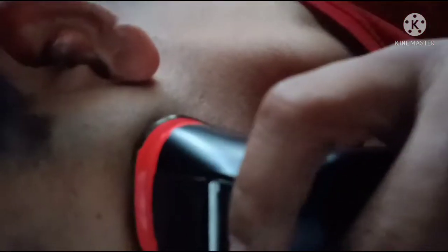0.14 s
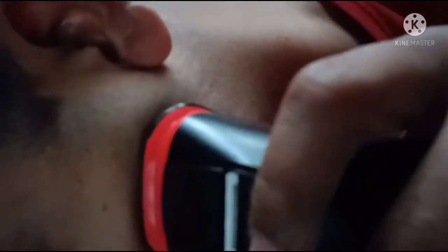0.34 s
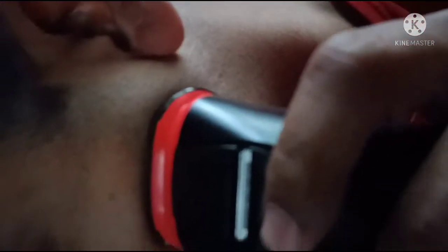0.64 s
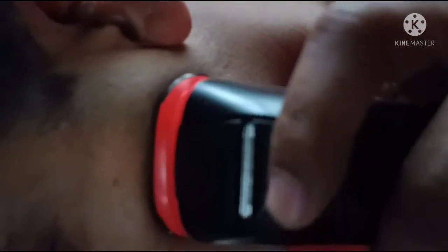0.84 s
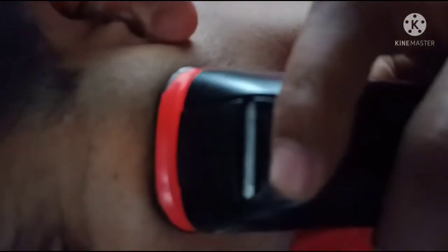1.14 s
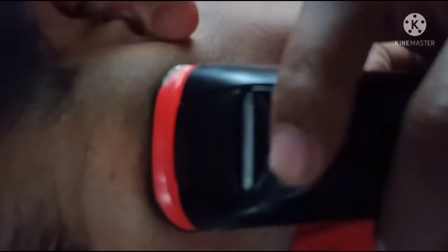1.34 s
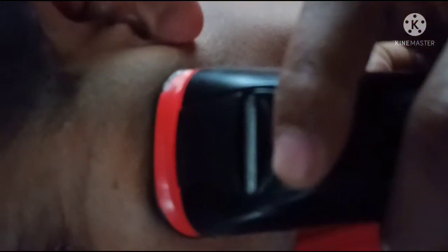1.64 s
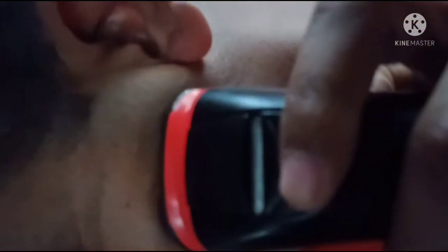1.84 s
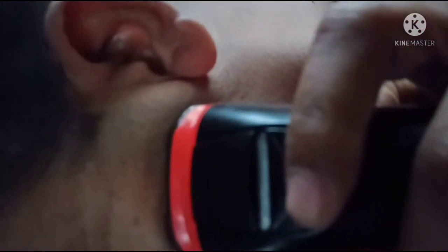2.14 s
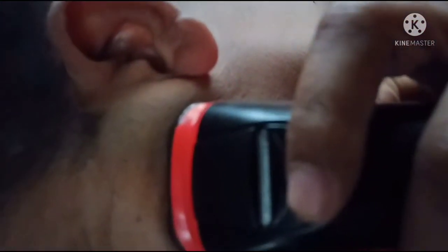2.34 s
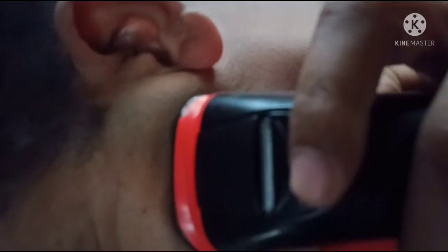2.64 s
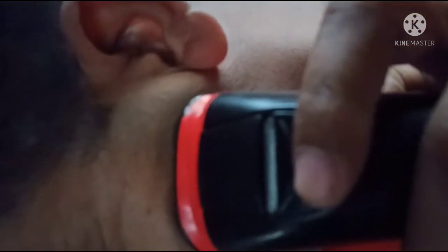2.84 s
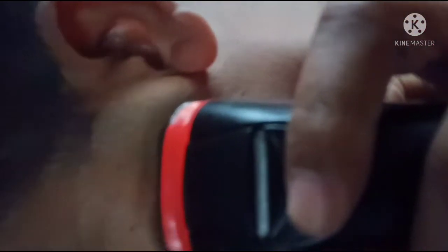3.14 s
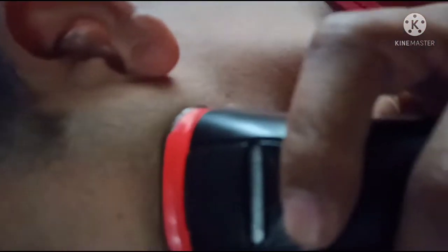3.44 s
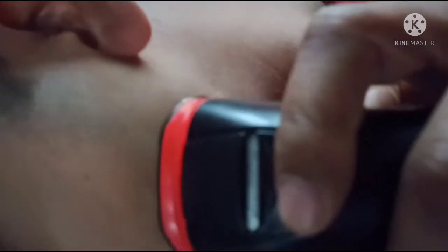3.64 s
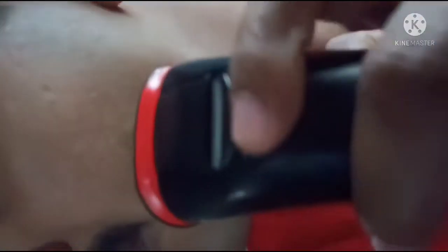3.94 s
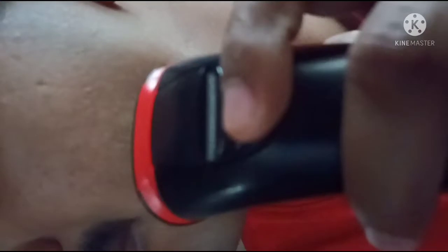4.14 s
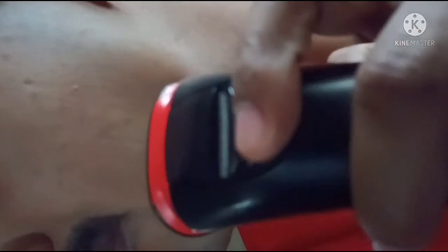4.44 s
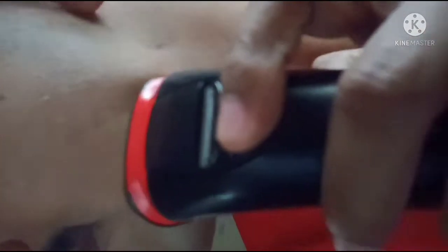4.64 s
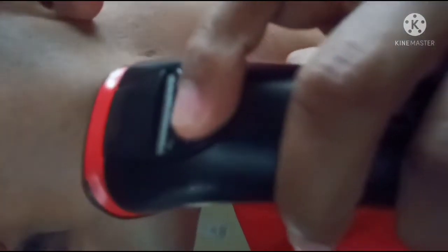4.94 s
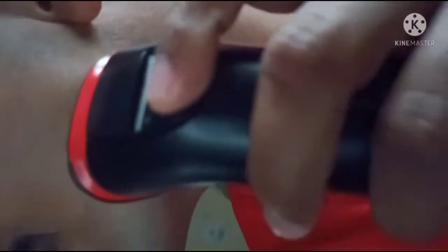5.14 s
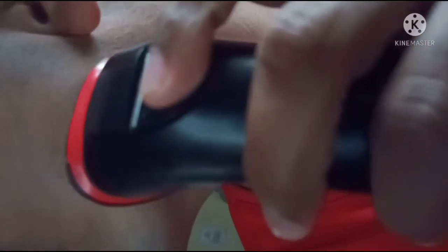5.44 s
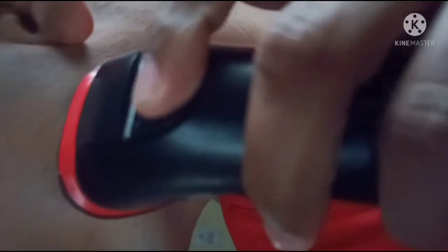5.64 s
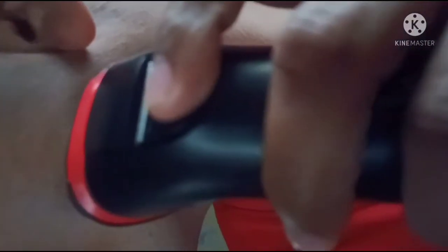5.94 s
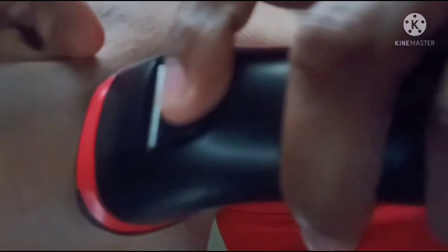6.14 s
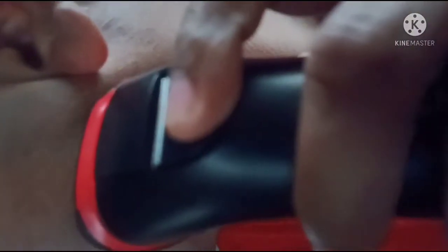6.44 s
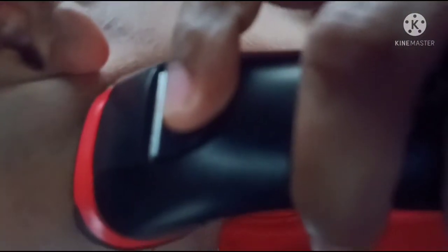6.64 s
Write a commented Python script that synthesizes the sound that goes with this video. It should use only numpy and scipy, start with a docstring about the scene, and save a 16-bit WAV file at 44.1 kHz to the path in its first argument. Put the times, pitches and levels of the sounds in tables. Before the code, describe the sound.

A geared electric shaver buzzes continuously for about 6.8 seconds, heard very close in a quiet room with only faint low noise behind. A rough rattle, fluttering nearly fifty times a second, sits under a steady gear whine around 2.4 kHz and a fine hiss from the metal foil. At 0 s it is pressed firmly, loud and ringing, with dull soft bumps around 0.3 to 0.4 s. By 0.8 s it lightens and thins. From about 2.3 s it is pressed again: the motor sags very slightly, rasp and hiss thicken, and a blade tone near 1.9 kHz swells, strongest around 3.2 to 4 s. Tiny dry hair ticks appear near 2.1, 3.0, and 4.0 to 4.5 s. From 4.7 s it speeds up and turns lighter, with looser metallic ringing and a faint bump at 5.0 s. Near 6.4 s the cutter settles, with tiny ticks, still buzzing at the end.

```python
"""A geared electric shaver is worked over a cheek, close by in a quiet room, for 6.8 seconds.
It starts pressed firmly, among a few soft bumps, then lightens within a second. From about 2.3 s it is
pressed again: the motor slows, the blades' tone swells and hairs tick. From about 4.7 s it runs lighter
and faster, its cutter loose until 6.4 s. Gear and blade tones, repeating rattle, bursts of ringing once
a turn and filtered noise make up the shaver; fading low tones make the bumps, quiet noise the room."""
import sys
import numpy as np
from scipy import signal
from scipy.fft import rfft, irfft, next_fast_len
from scipy.io import wavfile
from scipy.ndimage import map_coordinates

SR = 44100
rng = np.random.default_rng(int(sys.argv[2]) if len(sys.argv) > 2 else 0)


def wrap_up_sound(samples):
    """Save the sound to the file named by the first command line argument, as 16-bit audio."""
    columns = np.atleast_2d(samples).T
    # keep every value between -1 and 1, then stretch to whole-number steps
    tamed = np.clip(columns, -1, 1)
    steps = np.round(tamed * 32767).astype(np.int16)
    wavfile.write(sys.argv[1], SR, steps)


N = 299880
T = np.arange(N) / SR  # time of each sample in seconds

# Levels in the tables are those before any later filter or swell.
# Colour of the room's faint noise. Each row: pitch in Hz, level in dB.
ROOM_COLOUR = [(15, -47), (25, -38), (48, -0.5), (112, -2.5), (228, -5), (297, -7.5), (355, -9.5), (383, 0),
               (414, -12), (520, -14), (680, -10.5), (1140, -120)]
# Soft bumps. Each row: start in seconds, pitch in Hz, level in dB, rise in seconds, decay in seconds.
BUMPS = [(.01, 112.5, -52.5, 0.052, 0.098), (.283, 287, -44, 0.0014, 0.047),
         (.312, 230, -38.5, 0.0027, 0.018), (0.327, 164, -43.5, 0.022, 0.029),
         (0.381, 176.3, -40.5, 0.016, 0.061), (0.601, 171, -56, 0.025, 0.03),
         (1.19, 109, -53, 0.018, 0.021), (1.45, 194, -62, 0.076, 0.35), (3.03, 110, -59, 0.014, .025),
         (3.24, 115, -59, .015, 0.048), (4.382, 108, -53, 0.017, 0.019), (4.93, 180, -57, 0.019, 0.15),
         (5.022, 225, -47.5, 0.025, 0.024), (5.869, 223, -58, 0.016, .025), (6.1, 233, -64, 0.037, 0.15)]
# Thick hairs that snap. Each row: time in seconds, level in dB.
CUTS = [(2.005, -42), (2.144, -37), (2.325, -46), (2.999, -43), (4.003, -40), (4.064, -45), (4.224, -41),
        (4.461, -35), (6.444, -46), (6.709, -40)]
# Rings of the head that sound for a while, several of them overtones of the cutter's squeal. Each row: start
# and end in seconds, pitch in Hz, level in dB, # place in the turn from 0 to 1, decay as a share of the turn,
# roughness in radians.
BUZZES = [(-.2, .32, 1550, -37.5, .3, .14, .6), (-.2, .65, 2700, -48.5, .15, .1, .8),
          (-.1, .85, 6320, -57.5, .45, .15, 1.2), (-.2, .75, 8330, -58, .1, .3, 1.4),
          (.11, .75, 9850, -55, .75, .16, 1.2), (.5, .8, 3130, -54, .3, .4, .3),
          (.62, .8, 3630, -55, .3, .4, .3), (.8, 1.02, 4450, -51, .83, .14, .9),
          (.76, 1.08, 10750, -58, .4, .3, 1.2), (.95, 2.2, 8130, -57, .3, .4, .5),
          (1.25, 3.1, 3620, -52, .18, .55, .4), (1.1, 2.7, 2030, -45, .5, .85, .2),
          (1.15, 2.7, 1425, -48, .2, .4, .3), (2.15, 3.2, 8130, -53, .77, .2, .5),
          (2.7, 3.45, 2682, -47, .4, .9, .4), (4.1, 4.7, 3820, -49, .1, .4, .9),
          (5.0, 6.2, 6130, -56.5, .55, .45, .5), (5.05, 6.9, 8380, -55.5, .45, .35, 1.3),
          (5.4, 5.7, 8500, -54.5, .2, .4, 1.2), (5.1, 5.85, 11100, -63, .3, .4, 1.8),
          (5.95, 6.35, 12370, -54.5, .7, .4, 1.2), (6.4, 7.1, 12470, -53.5, .7, .4, 1.7),
          (6.2, 7, 6250, -58, .55, .45, 1.6)]

# Speed of the cutter. Each row: time in seconds, turns per second (Hz).
SPEED = [(0, 48.6), (.09, 48.92), (.55, 49.05), (.78, 49.0), (1.1, 48.47), (1.85, 48.4), (2.3, 48.13),
         (2.55, 48.18), (2.72, 47.92), (3.0, 47.83), (3.62, 47.92), (3.76, 47.73), (3.92, 47.72),
         (4.03, 47.33), (4.3, 47.5), (4.65, 47.95), (5.07, 48.78), (5.45, 48.95), (6.25, 48.64),
         (6.8, 48.63)]
# Pressure of the head on the skin. Each row: time in seconds, pressure (0 is a light touch, 1 is firm).
PRESSURE = [(0, 1.27), (.2, 1.07), (.5, 0.5), (.85, 0.21), (1.5, 0.42), (1.9, 0.41), (2.2, 0.61),
            (2.53, 0.57), (2.8, 0.89), (3.25, 0.79), (3.65, 0.7), (4.05, 0.91), (4.2, 0.72), (4.55, 0.7),
            (4.8, 0.54), (5.25, 0.19), (5.85, 0.2), (6.2, 0.44)]
# How three sounds grow with effort. Each holds: dB at a light touch, dB more at firm pressure,
# dB more at the heaviest drag.
RASP_LAW = (-44.5, 11.43, -0.62)
RATTLE_LAW = (-44, 10.5, -7.5)
MOTOR_LAW = (-55.5, 14.2, 1.5)

# Colour of the plastic housing. Each row: pitch in Hz, level in dB.
HOUSING = [(100, -44.5), (520, -31), (750, -22), (1000, -13.5), (1300, -9.5), (1480, 1), (1900, -4),
           (2430, 5), (2580, -6.5), (3000, -10.5), (3350, -20.5), (3750, -10), (4500, -10), (5600, -25.5)]
# Colour of the metal foil. Each row: pitch in Hz, level in dB.
FOIL = [(300, -57), (3300, 2.5), (4800, -12), (5600, 4), (7000, 5.5), (7600, -1), (8700, 4), (10200, 6.5),
        (11200, 4.5), (12600, 7), (14300, 1), (15400, 4)]
# Narrow resonances laid over both. Each row: pitch in Hz, width in Hz, lift in dB.
RINGS = [(900, 44, 4.5), (1287, 50, -4.5), (1520, 107, -8.5), (1700, 120, -2), (4100, 200, 4),
         (6120, 150, 6), (8110, 226, 6.5), (8570, 130, 7.5), (9480, 540, 8), (10130, 140, 3.5),
         (12300, 270, 2.5), (5900, 70, 0.5), (5660, 39, 5), (6790, 59, 2.5), (8140, 99, 8),
         (9300, 150, 1.5), (4630, 79, -5)]
# The housing resonance damped by the skin. It holds: pitch in Hz, width in Hz, dB at firm pressure.
DAMPED = (2406, 260, -6.5)
# How hand and cheek lie round the head. Each row: time in seconds, gain of the hollows in dB
# (negative as they close in) before each hollow takes its share.
GRIP = [(0, -1.5), (.5, 5), (.76, -0.5), (.9, -2), (1.9, -6), (2.9, -0.5), (4.1, 1.5), (4.4, -2.5),
        (5.2, -0.5), (5.6, 1.5), (6.8, 0)]
# Bands that hand and cheek damp. Each row: pitch in Hz, width in Hz, share of the gain above.
HOLLOWS = [(2800, 655, 0.99), (6100, 1600, 0.27), (14700, 770, 0.25)]
# Gliding hollows and peaks. Each row: start and end in seconds, from Hz, to Hz, width in Hz, gain in dB.
SWEEPS = [(0.65, 1.3, 4000, 2960, 400, -10), (.25, 1.0, 12200, 11800, 620, -7),
          (.6, 2.5, 11700, 11200, 400, -6), (.5, 2.6, 14700, 14300, 900, -4),
          (2.9, 5.9, 2400, 3100, 210, -4), (1.6, 3.9, 7650, 7450, 200, -3), (4.3, 6.4, 3400, 3600, 300, -6),
          (4.9, 5.8, 12800, 16000, 700, -6), (5.0, 6.16, 6900, 6600, 450, -10),
          (4.96, 5.9, 9700, 9100, 490, -4), (5.9, 7.4, 14500, 13800, 600, 3),
          (4.2, 5.5, 11300, 11900, 400, -4), (1, 1.7, 6700, 6750, 300, -4), (5.5, 7.2, 3150, 3200, 150, -5),
          (4.9, 7.6, 8600, 8400, 200, 3)]

# Spells in which the cutter rocks, seated or loose, and rings at two pitches. Each row: time of the
# height in seconds, swell in seconds, fade in seconds, low pitch in Hz, low level in dB,
# high pitch in Hz, high level in dB.
ROCKING = [(.26, 0.11, 0.15, 2010, -35.5, 4110, -34), (.52, 0.24, 0.34, 2209, -34, 4205, -50.5),
           (1.5, 0.57, 0.84, 2220, -69, 4200, -44.5), (2.55, 0.51, 0.65, 2040, -69, 4156, -43),
           (3.8, 0.67, 0.61, 1944, -41.5, 4104, -48), (4.45, 0.3, 0.26, 2190, -58, 4150, -43.5),
           (4.85, 0.2, 0.26, 2072, -41, 4330, -50.5), (5.16, 0.25, 0.36, 2119, -33, 4330, -46),
           (5.65, 0.44, 0.26, 2076, -48, 4295, -47), (5.97, 0.21, 0.15, 2120, -39, 4215, -45.5),
           (6.17, 0.19, 0.12, 2050, -51, 4180, -40), (6.55, 0.37, 0.88, 2070, -45, 4230, -50.5)]
# Knocks of the seated cutter: stroke, rebound, return. Each row: place in the turn from 0 to 1,
# level in dB against the others, rise and decay as shares of the turn.
STROKES = [(.81, 0, .04, .17), (.1, -4, .11, .15), (.32, -5, .04, .05)]
# How loosely the cutter rides. Each row: time in seconds, looseness (0 is seated, 1 is free).
LOOSE = [(4.65, 0), (4.85, 1), (6.25, 1), (6.45, 0)]

# Tone of the blades. Each row: multiple of the cutter turn, level in dB against the others.
BLADE_TONES = [(8, -39.5), (16, -17.5), (24, -5), (32, -6), (35, -8), (38, -9), (40, 0.5), (48, -10),
               (56, -3)]
# Swelling of that tone as the blades bite. Each row: time in seconds, level in dB.
BLADE_LEVEL = [(0, -43), (.7, -67), (1.9, -64), (2.25, -51), (2.65, -46), (2.8, -44.5), (3.2, -39.5),
               (3.8, -40.5), (4.05, -40.5), (4.4, -57), (4.7, -60), (6.8, -75)]
# Hiss of the foil. Each row: time in seconds, level in dB.
HISS = [(0, -47.5), (.6, -49), (.8, -51), (1.7, -51.5), (2.4, -47), (2.95, -44.5), (3.3, -45.5),
        (4.05, -44.5), (4.6, -48), (5.3, -51), (6.2, -49), (6.8, -51)]
# Tufts of stubble. Each row: time of the height in seconds, length in seconds, swell in dB.
TUFTS = [(2.323, 0.074, 2.5), (2.933, 0.12, 0.5), (3.24, 0.066, 1.5), (4.077, 0.13, 3), (6.446, 0.05, 1)]
# Housing resonances that flare as hairs catch. Each row: pitch in Hz, width in Hz.
FLARES = [(1150, 62), (1550, 180), (1850, 280), (2150, 100), (2680, 220)]
# Foil resonances that flicker at random, each by itself, as the shaver moves.
# Each row: pitch in Hz, width in Hz.
FOIL_FLICKERS = [(5800, 770), (8200, 300), (9600, 360), (12400, 700), (14800, 900)]

# Tones of the cutter gear. Each row: multiple of the cutter turn, level in dB against the others.
GEAR_TONES = [(16, -26.5), (19, -31), (20, -19), (25, -9), (28, -22), (42, -12), (50, 12.5), (100, -31),
              (125, -20)]
# Whine of that gear as a whole. Each row: time in seconds, level in dB.
WHINE = [(0, -40), (.35, -53), (.6, -36.5), (1.0, -37), (1.8, -34), (2.15, -32.5), (3.0, -38), (3.28, -45),
         (3.9, -38), (4.2, -40), (4.55, -34.5), (4.8, -40.5), (5.15, -37), (5.8, -35.5), (6.4, -42.5),
         (6.8, -45)]
# Tones of the motor. Each row: multiple of the motor turn, level in dB against the others.
MOTOR_TONES = [(1, -32.5), (9, -19), (13, 1)]
# Hums and thin whistles. Each row: start and end in seconds, multiple of the motor turn, level in dB.
WHISTLES = [(-.3, .45, 6, -57), (.2, .9, 6, -66), (-.1, .7, 15, -43), (.6, 1.1, 15, -52),
            (1.1, 2.5, 6, -69), (5.1, 6, 6, -69), (.6, 2.5, 8, -63), (4.6, 7.2, 8, -66), (-.5, .67, 9, -58),
            (5.4, 6.9, 9, -59), (.75, 2.3, 90, -63), (.75, 2.3, 93, -64), (1.1, 2.1, 71, -61),
            (2.1, 4.8, 90, -62), (4.75, 6.1, 90, -55), (5.8, 7.2, 90, -60), (5, 6.6, 85, -70),
            (5, 5.9, 88, -69), (6.05, 7, 64, -64)]
MOTOR_TURNS = 26 / 11  # turns of the motor for each turn of the cutter


def undb(db):
    """Turn decibels into a gain."""
    return 10 ** (np.asarray(db) / 20)


def curves(table):
    """Join each column of a timed table by straight lines."""
    s, *columns = np.transpose(table)
    return [np.interp(T, s, column) for column in columns]


def unit(x):
    """Scale a sound to an average (rms) strength of 1."""
    return x / np.sqrt(np.mean(x ** 2))


def walk(rate):
    """Wander smoothly at random, with about `rate` new values a second and a spread of 1."""
    knots = rng.standard_normal(8192)
    return unit(map_coordinates(knots, [T * rate], order=2, mode="mirror"))


def spell(start, end):
    """Pick the samples between two times, with a rounded swell over them."""
    on = (T > start) & (T < end)
    progress = (T[on] - start) / (end - start)
    return on, np.sqrt(np.abs(np.sin(np.pi * progress)))


def band_of(x, centre_hz, width_hz, power=2):
    """Take out one band round a pitch; a higher power gives a flatter top."""
    hz = np.arange(N // 2 + 1) * SR / N
    return irfft(rfft(x) * np.exp(-((hz - centre_hz) / width_hz) ** power), N)


def colour(x, points, rings=(), tilt_db=0):
    """Ring a sound through a body: a broad colour, narrow resonances and a slope in dB per octave."""
    size = next_fast_len(N + 8192) // 2 * 2
    hz = np.maximum(np.arange(size // 2 + 1) * SR / size, 1)
    at, db = np.transpose(points)
    gain_db = np.interp(np.log(hz), np.log(at), db)
    gain_db = gain_db + tilt_db * np.log2(np.maximum(hz, 500) / 2000)  # the slope is level below 500 Hz
    gain_db = gain_db - 12 * np.maximum(np.log2(hz / at[-1]), 0)  # falls off above the last point
    for centre_hz, width_hz, lift_db in rings:
        gain_db = gain_db + lift_db * np.exp(-((hz - centre_hz) / width_hz) ** 2)
    # keeping one half of the cepstrum makes the body ring after a knock, never before it
    cepstrum = irfft(np.log(undb(gain_db)))
    response = np.exp(rfft(2 * cepstrum[:size // 2], size))
    return irfft(rfft(x, size) * response)[:N]


def tones(turn, table):
    """Sing steady sines on whole multiples of a shaft's turn."""
    lines = (undb(db) * np.sin(2 * np.pi * (round(k) * turn + rng.random())) for k, db in table)
    return unit(sum(lines))


def clatter(turn, count, size):
    """Repeat a pattern of tooth contacts every turn, slowly blending through `count` random patterns."""
    out = np.zeros(N)
    position = np.linspace(0, count - 1, N)
    for k in range(count):
        pattern = irfft(np.exp(2j * np.pi * rng.random(size)), 8192)
        away = np.abs(position - k)
        near = away < 1
        places = np.linspace(0, 1, len(pattern))
        contacts = np.interp(turn[near] % 1, places, pattern)
        out[near] += np.cos(np.pi / 2 * away[near]) * contacts
    return unit(out)


def bursts(turn, turn_hz, pitch_hz, place, rise, fall, rough):
    """Ring once a turn; place, rise and fall are shares of the turn, rough (rad) spreads the pitch."""
    shifted = turn - place + .3
    number = np.floor(shifted).astype(int) + 2
    timing, strength = rng.standard_normal((400, 2))[number].T
    offset = shifted % 1 - .3  # turns since the height of the burst
    swell = np.where(offset < 0, np.exp(-(offset / rise) ** 2), np.exp(-np.abs(offset) / fall))
    swell = swell * np.minimum(20 * np.minimum(offset + .3, .7 - offset), 1)  # no click between bursts
    # small knocks disturb the ring: ten that repeat every turn, plus a weaker part that is new
    pattern = np.tile(unit(rng.standard_normal(10)), 420) + .35 * rng.standard_normal(4200)
    knocks = np.interp(turn * 10, np.arange(4200), pattern)
    # each ring comes slightly early or late, and a little stronger or weaker
    ring = np.sin(2 * np.pi * pitch_hz * offset / turn_hz + .2 * timing + rough * knocks)
    return unit(swell * ring * undb(.7 * strength))


def drag():
    """Read the drag of the stubble, 0-1, from how far the motor is below its fastest speed."""
    speed_hz, = curves(SPEED)
    return (speed_hz.max() - speed_hz) / np.ptp(speed_hz)


def effort(law):
    """Give the level in dB of a sound that follows pressure on the skin and drag on the motor."""
    light_db, pressed_db, dragged_db = law
    pressure, = curves(PRESSURE)
    return light_db + pressed_db * pressure + dragged_db * drag()


def room_noise():
    """The quiet room is a faint, mostly low noise with a slightly wandering level."""
    noise = unit(colour(rng.standard_normal(N), ROOM_COLOUR))
    return noise * undb(-66.5 + .8 * walk(6))


def bumps():
    """Dull low thuds swell and die away, unsteady in pitch."""
    out = np.zeros(N)
    wobble = .6 * walk(50)  # radians
    for s, hz, db, rise, decay in BUMPS:
        age = np.maximum(T - s, 0)
        swell = np.minimum(age / rise, 1) * np.exp(-np.maximum(age - rise, 0) / decay)
        out += undb(db) * swell * np.sin(2 * np.pi * hz * age + wobble)
    return out


def cuts():
    """A thick hair snaps between the blades and the foil ticks: a very short burst of bright noise."""
    decay_s = 0.0026
    envelope = sum(undb(db) * (T >= s) * np.exp(-np.abs(T - s) / decay_s) for s, db in CUTS)
    return envelope * unit(colour(rng.standard_normal(N), FOIL, RINGS, tilt_db=6))


def buzzes(turn):
    """Rings are struck once a turn over spells that swell and fade; several are overtones of the cutter's
    squeal."""
    speed_hz, = curves(SPEED)
    out = np.zeros(N)
    for start, end, hz, db, place, fall, rough in BUZZES:
        on, touch = spell(start, end)
        buzz = bursts(turn[on], speed_hz[on], hz, place, rise=.09, fall=fall, rough=rough)
        out[on] += undb(db) * touch * buzz
    return out


def muffle(x):
    """Hand and cheek deepen the hollows between the resonances when they close round the head."""
    grip_db, = curves(GRIP)
    out = x
    for centre_hz, width_hz, share in HOLLOWS:
        out = out + (undb(share * grip_db) - 1) * band_of(x, centre_hz, width_hz, power=4)
    return out


def sweep(x):
    """Reflections from hand and cheek carve hollows and peaks that glide as the shaver moves."""
    hz, s, frames = signal.stft(x, SR, nperseg=1024)
    gain_db = np.zeros(frames.shape)
    for start, end, from_hz, to_hz, width_hz, db in SWEEPS:
        progress = np.clip((s - start) / (end - start), 0, 1)
        centre_hz = from_hz + (to_hz - from_hz) * progress
        on = (s > start) & (s < end)
        shape = np.exp(-((hz[:, None] - centre_hz[on]) / width_hz) ** 2)
        gain_db[:, on] += db * np.sin(np.pi * progress[on]) * shape
    return signal.istft(frames * undb(gain_db), SR, nperseg=1024)[1][:N]


def damp(x):
    """The skin takes the ring out of one housing resonance as the head is pressed down."""
    centre_hz, width_hz, pressed_db = DAMPED
    pressure, = curves(PRESSURE)
    return x + (undb(pressed_db * pressure) - 1) * band_of(x, centre_hz, width_hz)


def flicker(x, resonances, depth_db):
    """Each resonance swells and shrinks by itself at random."""
    out = x
    for centre_hz, width_hz in resonances:
        change_db = depth_db * np.clip(walk(55), -2, 2)
        out = out + (undb(change_db) - 1) * band_of(x, centre_hz, width_hz)
    return out


def rocking():
    """Spells swell and fade like bells; their powers add and pitch passes from one to the next."""
    s, swell, fade, low_hz, low_db, high_hz, high_db = np.transpose(ROCKING)
    age = T[:, None] - s
    power = np.exp(-2 * (age / np.where(age < 0, swell, fade)) ** 2) + 1e-18
    share = power / power.sum(axis=1, keepdims=True)
    low_gain = np.sqrt(power @ undb(low_db) ** 2)
    high_gain = np.sqrt(power @ undb(high_db) ** 2)
    return share @ low_hz, low_gain, share @ high_hz, high_gain


def chatter(turn):
    """The cutter rocks in its seat every turn and rings at two pitches, more raggedly under drag."""
    speed_hz, = curves(SPEED)
    low_hz, low_gain, high_hz, high_gain = rocking()
    low_rough = .05 + .7 * drag() ** 2
    high_rough = .15 + 1.0 * drag() ** 2
    # the low ring swells twice a turn
    low = bursts(turn, speed_hz, low_hz, place=.74, rise=.14, fall=.24, rough=low_rough)
    second = bursts(turn, speed_hz, low_hz, place=.33, rise=.11, fall=.24, rough=low_rough)
    low = low + undb(-1.5) * second
    # held in its seat the cutter knocks three times a turn; riding loose it rings once
    seated = np.zeros(N)
    for place, db, rise, fall in STROKES:
        seated += undb(db) * bursts(turn, speed_hz, high_hz, place, rise, fall, high_rough)
    riding = bursts(turn, speed_hz, high_hz, place=.55, rise=.07, fall=.2, rough=high_rough)
    loose, = curves(LOOSE)
    high = np.sqrt(1 - loose) * unit(seated) + np.sqrt(loose) * riding
    return unit(low) * low_gain + high * high_gain


def blades(turn):
    """Blades scrape the foil harder at some places of the turn and snip single hairs."""
    load = drag()
    hiss_db, = curves(HISS)
    tuft_db = sum(db * np.exp(-(2 * (T - s) / length) ** 2) for s, length, db in TUFTS)
    # the more the stubble drags, the more the scraping surges
    surge = undb((1.06 + 0.18 * load) * np.clip(walk(45), -2, 2))
    bite = undb(0.78 * clatter(turn, count=6, size=12))
    # about 900 snips a second, of random strength
    snip_gain = undb(4.2 * np.minimum(rng.exponential(size=N), 4))
    snips = unit((rng.random(N) < 900 / SR) * rng.choice([-1, 1], N) * snip_gain)
    # part of the scraping repeats from turn to turn, part is new each time
    repeat = clatter(turn, count=9, size=330)
    scrape = bite * (rng.standard_normal(N) + repeat + undb(-7.0) * snips)
    body = colour(scrape * surge, HOUSING, RINGS, tilt_db=-0.6)
    rasp = unit(flicker(body, FLARES, 1.2 + 3.6 * load))
    # in the foil the repeating part weakens under drag
    foil_repeat = undb(1.5 - 6 * load) * clatter(turn, count=8, size=330)
    foil = bite * (rng.standard_normal(N) + undb(-7.0) * snips + foil_repeat)
    foil_ring = colour(foil * undb(0.5 * walk(70)), FOIL, RINGS)
    hiss = unit(flicker(foil_ring, FOIL_FLICKERS, 1.6))
    return rasp * undb(effort(RASP_LAW) + tuft_db) + hiss * undb(hiss_db + tuft_db)


def rattle(turn):
    """Play in the gears shakes the housing; pressed blades add their own tone."""
    motor_teeth = clatter(turn * MOTOR_TURNS, count=3, size=140)
    teeth = clatter(turn, count=5, size=330) + undb(-0.5) * motor_teeth
    body = unit(colour(teeth, HOUSING, RINGS, tilt_db=0.43))
    blade_db, = curves(BLADE_LEVEL)
    # the blades wander a little in timing and level, as hairs resist them
    lag = .002 * walk(35)  # turns
    waver_db = 2.2 * np.clip(walk(22), -2, 1.3)
    blade_tone = tones(turn + lag, BLADE_TONES) * undb(blade_db + waver_db)
    return body * undb(effort(RATTLE_LAW)) + blade_tone


def whine(turn):
    """The gears sing on multiples of the shaft's turn; the motor adds its own tone, hums and whistles."""
    gear_db, = curves(WHINE)
    motor_turn = turn * MOTOR_TURNS
    out = tones(turn, GEAR_TONES) * undb(gear_db + 0.78 * walk(40))
    out += tones(motor_turn, MOTOR_TONES) * undb(effort(MOTOR_LAW) + 1.0 * walk(27))
    for start, end, multiple, db in WHISTLES:
        on, swell = spell(start, end)
        out[on] += undb(db) * swell * tones(motor_turn[on], [(multiple, 0)])
    return out


def shaft():
    """Count the cutter's turns; its speed trembles slightly, and more as hairs snag it."""
    speed_hz, = curves(SPEED)
    tremble = 0.000357 * walk(40) + 0.001105 * drag() * walk(14)
    return np.cumsum(speed_hz * (1 + tremble)) / SR


def scene():
    """One shaft times the gears, cutter and blades; snapping hairs, bumps and room noise are added."""
    turn = shaft()
    housing = damp(rattle(turn) + blades(turn))
    head = sweep(muffle(whine(turn) + chatter(turn) + housing))
    shaver = head + buzzes(turn) + cuts()
    return (shaver + bumps() + room_noise())[None]


def record(dry):
    """The phone that hears the shaver cuts the top above 15450 Hz."""
    lowpass = signal.firwin(801, 15450, fs=SR)
    return signal.fftconvolve(dry, lowpass[None], mode="same")


dry = scene()
out = record(dry)
wrap_up_sound(out)
```